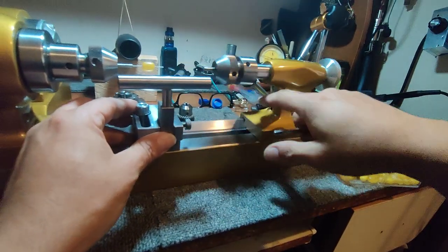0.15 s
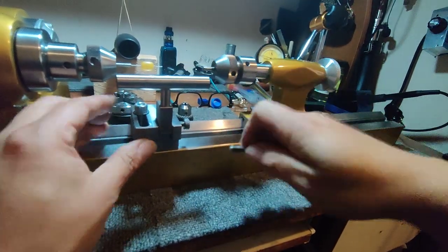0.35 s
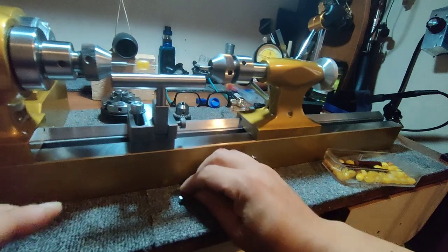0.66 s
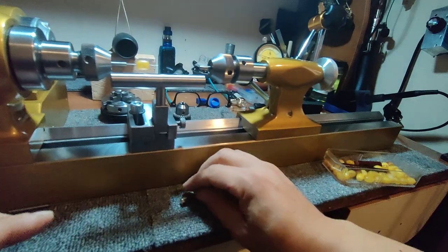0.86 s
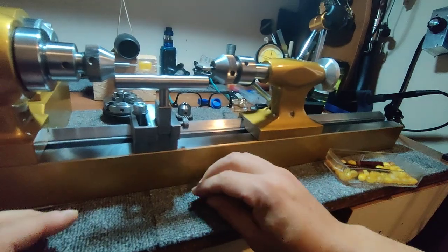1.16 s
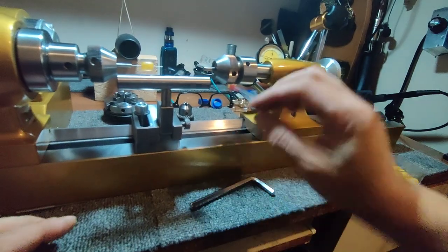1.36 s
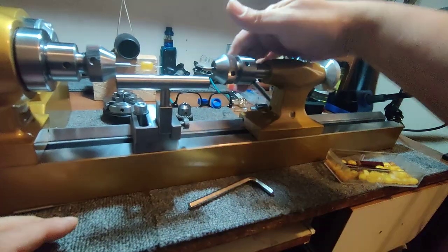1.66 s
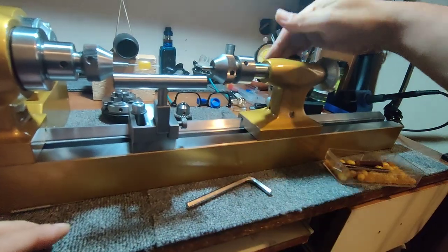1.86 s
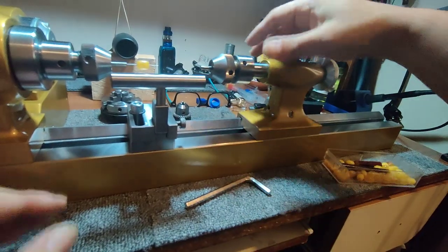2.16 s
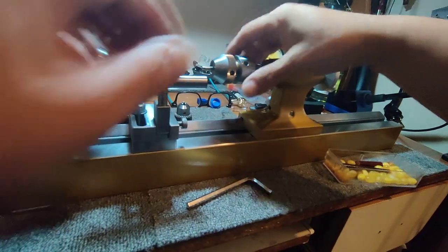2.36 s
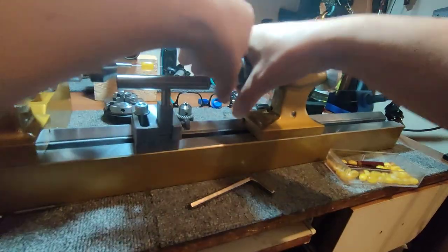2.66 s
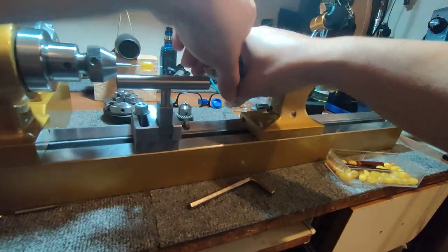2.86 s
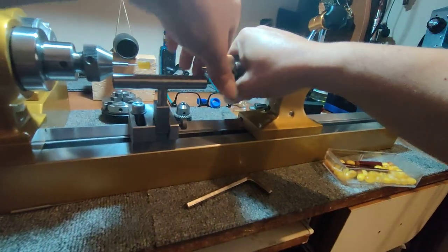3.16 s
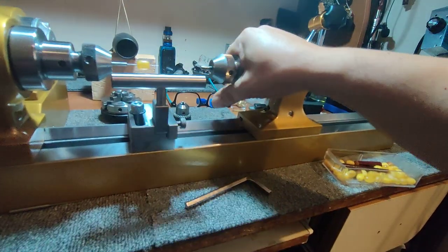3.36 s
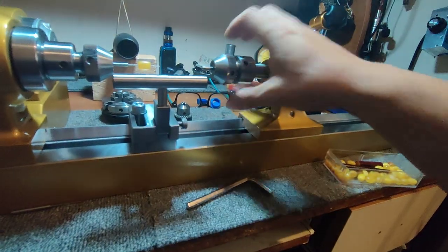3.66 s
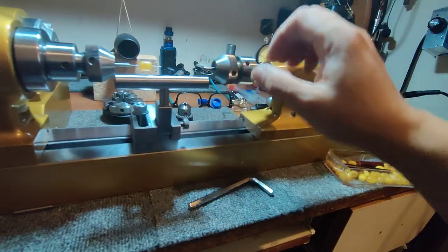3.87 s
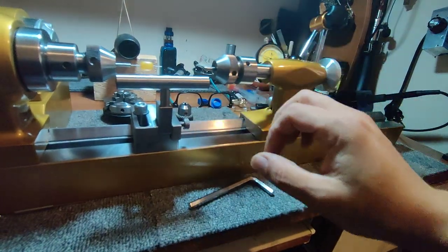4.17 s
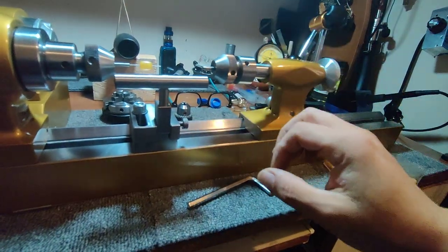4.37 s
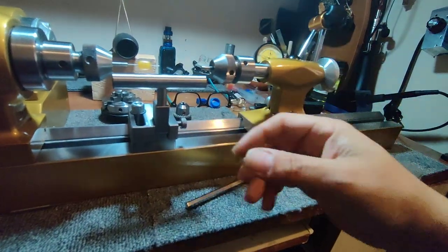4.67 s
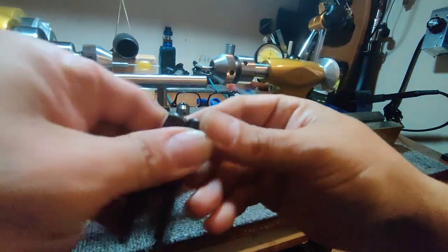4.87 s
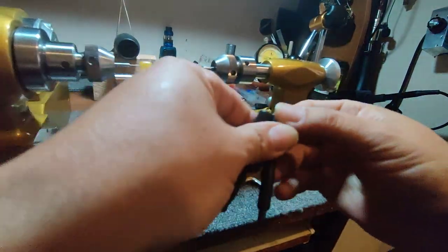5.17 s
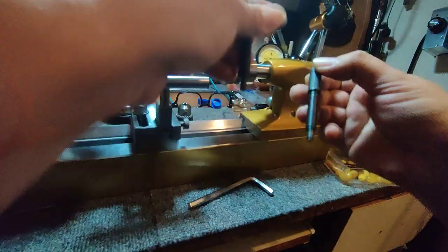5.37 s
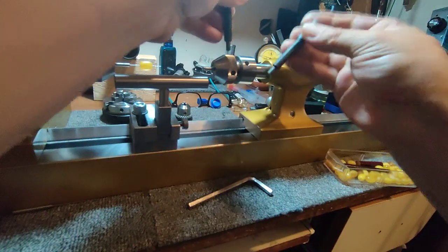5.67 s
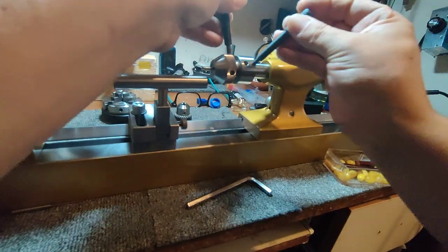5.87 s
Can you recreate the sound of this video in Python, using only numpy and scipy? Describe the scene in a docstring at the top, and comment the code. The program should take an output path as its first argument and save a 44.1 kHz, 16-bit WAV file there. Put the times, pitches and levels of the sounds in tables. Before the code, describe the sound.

Close up in a quiet room, a metal key drops and rings, a machine part thuds home, and steel rods clink, scrape and clack sharply.

```python
"""A quiet room: hands adjust a small metal lathe on a mat-covered workbench, heard from close by.
A hex key is laid down and rings; the tailstock is pushed home with a knock; two steel rods are picked up
with clinks and a scrape, clack together once and are fitted to the chuck. Blows, clinks and clack are
dying modes plus noise bursts; friction is grainy noise, partly driving modes; hum, hiss and rumble are
shaped noise."""
import sys
import numpy as np
from scipy import signal
from scipy.fft import rfft, irfft
from scipy.io import wavfile
from scipy.ndimage import uniform_filter1d

SR = 44100
rng = np.random.default_rng(int(sys.argv[2]) if len(sys.argv) > 2 else 0)


def unload_wav(signal):
    """Save mono or channel-first audio to the path in sys.argv[1] as 16-bit WAV at rate SR, clipped to [-1, 1]."""
    wavfile.write(
        sys.argv[1],
        SR,
        np.round(np.clip(np.atleast_2d(signal).T, -1, 1) * 32767).astype(np.int16),
    )


N = 265041
T = np.arange(N) / SR

# lathe bed and bench top modes: f/Hz, relative level/dB, t60/s
BED_MODES = [(49.6, -10.5, 0.45), (118.9, 0.5, 0.18), (172, -22, 0.28), (211.7, -14, 0.2),
             (237.9, -11.5, 0.23), (295.1, -6, .2), (323, -15, 0.19), (418, 7, 0.068), (440, -10.5, 0.096),
             (467.5, -5, 0.14), (541.6, -12, 0.1803), (587.6, -11, 0.11), (657, -15, 0.14),
             (744, -20, 0.17), (920, -12, 0.085), (1300, -18, 0.099)]
# free rod modes: f/Hz, relative level/dB, t60/s
ROD_RING_MODES = [(7820, -4, 0.11), (7892, -1, 0.21), (8039, -9.5, 0.18), (8240, -18, 0.097),
                  (7810, 4.5, 0.041), (6210, -5, 0.037), (10000, -28, 0.097)]
# lower rod modes, damped by the fingers: f/Hz, relative level/dB, t60/s
ROD_DAMPED_MODES = [(1750, -4.5, .04), (1960, -5, .04), (2230, -4.5, .04), (2470, -4, .04), (2900, -5, .04),
                    (3750, -4, .035), (4410, -1, 0.042), (4750, -1, 0.037), (5430, -1, 0.034),
                    (6060, 0, 0.039), (6760, -2.5, 0.035)]
# steel contact spectrum: f/Hz, relative density/dB per Hz
TICK_SPECTRUM = [(600, -21), (1300, -17), (1800, 0.5), (3200, -4), (4800, 1.5), (6300, 5), (7400, -2),
                 (8100, -16), (9000, -29), (16000, -32)]


def amp(db):
    """Decibels to gain."""
    return 10 ** (np.asarray(db) / 20)


def evened(x):
    """Scales to rms 1."""
    return x / np.sqrt(np.mean(x ** 2) + 1e-20)


def grainy(grain_db, samples):
    """Gain over time that wanders at random by grain_db rms; samples sets the smoothing."""
    return amp(grain_db * evened(uniform_filter1d(rng.standard_normal(N), size=samples)))


def read(points, hz):
    """Reads a table on a log-frequency axis."""
    f, value = np.transpose(points)
    return np.interp(np.log(hz + 1), np.log(f + 1), value)


def sides(pan_db):
    """Left and right gains; positive favours left."""
    return amp([[pan_db / 2], [-pan_db / 2]])


def both_ears(x, left_lag_s=0.00014):
    """One sound from the side of the rods, reaching the left ear later."""
    return np.array([np.roll(x, round(left_lag_s * SR)), x])


def add(mix, s, sound):
    """Mixes a sound in at time s."""
    part = mix[:, max(round(s * SR), 0):][:, :sound.shape[-1]]
    part += sound[..., :part.shape[1]]


def colour(x, spectrum, size=2048):
    """Causal minimum-phase filter of unit energy with the given spectrum."""
    hz = abs(np.fft.fftfreq(size, 1 / SR))
    log_gain = np.log(amp(np.maximum(read(spectrum, hz), -100)))
    response = np.exp(np.conj(signal.hilbert(log_gain)))
    taps = np.fft.ifft(response).real[:size // 2]
    return signal.oaconvolve(x, taps[None] / np.linalg.norm(taps), axes=1)[:, :x.shape[1]]


def noise(spectrum, likeness=None):
    """Steady stereo noise of rms 1; likeness sets how alike the ears are at each pitch."""
    # f/Hz, left-right likeness (below 0 counts as 0)
    usual_likeness = [(25, 0.88), (60, 0.99), (130, 0.55), (290, 0.94), (640, 0.33), (1410, -0.11),
                      (3100, -0.07), (6820, -0.35), (15000, 0.01)]
    hz = np.fft.rfftfreq(N, 1 / SR)
    a, b = rfft(rng.standard_normal((2, N)))
    same = np.clip(read(usual_likeness if likeness is None else likeness, hz), 0, 1)
    pair = np.array([a, same * a + np.sqrt(1 - same ** 2) * b])
    return evened(irfft(pair * amp(read(spectrum, hz)), N))


def ring(modes, step=1):
    """Dying modes, mode k weighted by step ** k: a negative step alternates the starting direction."""
    t = np.arange(SR)[None] / SR
    return sum(step ** k * amp(db) * np.exp(-np.log(1000) * t / t60) * np.sin(2 * np.pi * hz * t)
               for k, (hz, db, t60) in enumerate(modes))


def driven(x, modes):
    """Friction x keeps these modes ringing through a response of unit energy."""
    response = ring(modes, step=-0.98)
    return signal.oaconvolve(x, response / np.linalg.norm(response), axes=1)[:, :N]


def burst(decay_s, rise_s=.0001, size=6000):
    """A contact: a spray of tiny impacts that builds and quickly dies."""
    t = np.arange(size) / SR
    return rng.standard_normal((2, size)) * np.exp(-t / decay_s) * (1 - np.exp(-t / rise_s))


def bounces(s, touches, gap_s, fade_db):
    """Time and relative dB of each touch as a part comes to rest."""
    return [(s + k * gap_s, k * fade_db) for k in range(touches)]


def struck(hits, modes, right_lag_s, focus_db=8.5):
    """Each hit rings the same modes, weaker by focus_db one octave off its own pitch; right lags."""
    out = np.zeros((2, N))
    for s, db, focus_hz in hits:
        focused = [(hz, mode_db - focus_db * np.log2(hz / focus_hz) ** 2, t60)
                   for hz, mode_db, t60 in modes]
        sound = amp(db) * ring(focused, step=-0.98)
        add(out[:1], s, sound)
        add(out[1:], s + right_lag_s, sound)
    return out


def swells(rows):
    """Gain over time: one smooth bell for each (middle, length, dB) movement."""
    return sum(amp(db) * np.exp(-2 * ((T - s) / length * 2) ** 2) for s, length, db in rows)


def room(x, wet_db, gap_s=.003, step_size=12):
    """Adds the dense short echo of the bench, machine and near walls."""
    # f/Hz, t60/s
    room_t60 = [(100, 0.29), (500, .25), (2000, 0.18), (7000, 0.19), (14000, 0.14)]
    count = SR // 2 // step_size
    taps = np.zeros((2, SR))
    at = round(gap_s * SR) + step_size * np.arange(count) + rng.integers(0, step_size, (2, count))
    np.put_along_axis(taps, at, rng.choice([-1., 1.], at.shape), 1)
    hz, t, z = signal.stft(taps, SR, nperseg=256)
    decay = np.exp(-np.log(1000) * t / read(room_t60, hz)[:, None])
    tail = signal.istft(z * decay, SR, nperseg=256)[1]
    return x + amp(wet_db) * signal.fftconvolve(x, tail / np.linalg.norm(tail[0]), axes=1)[:, :N]


def bench(build_up_s=0.0044):
    """Blows ring bed and bench top: light parts touch briefly and spare deep modes; loose parts clatter."""
    # blows: t/s, level/dB, lowest f moved/Hz, loose-part clatter/dB, touches
    knocks = [(0.072, -54, 69.5, -76, 1), (0.324, -59.5, 70, -85, 1), (0.428, -64, 70, -85, 1),
              (0.697, -38.5, 89, -52, 1), (0.702, -39, 398, -54, 1), (1.241, -46, 201, -80, 1),
              (1.278, -51.5, 150, -60, 1), (1.712, -46, 378, -57.5, 1), (1.762, -48.5, 378, -67, 1),
              (1.851, -34, 353, -44.5, 1), (1.859, -31, 348, -45.5, 1), (1.914, -51, 204, -32.5, 1),
              (1.921, -22, 57.6, -42, 1), (3.105, -52, 60, -74, 1), (3.172, -42.5, 300, -64, 2),
              (4.088, -43, 240, -54.5, 2), (4.152, -44.5, 236, -50.5, 1), (4.288, -39.5, 210, -44.5, 1),
              (4.361, -42, 259, -47, 1), (4.413, -45.5, 200, -61, 1), (5.883, -44.5, 531, -54, 1),
              (5.969, -42, 517, -52.5, 1)]
    # f/Hz, relative density/dB per Hz
    clatter = [(290, -19.5), (500, -2.5), (714, -9), (1650, -14.5), (2170, -15.5), (2610, -12), (3270, -17),
               (3750, -16.5), (5230, -16), (6570, -16.5), (8250, -38), (15000, -46)]
    heavy_contact_s, half_contact_hz = 0.0023, 583  # halved for a part that moves nothing below this
    rock_s, rock_db = 0.017, -2.5  # a part that rocks into its seat touches again later and weaker
    body, loose = np.zeros((2, 2, N))
    t = np.arange(SR // 20) / SR
    spread = 1 - np.exp(-np.arange(SR) / SR / build_up_s)  # bending waves take a moment to fill the top
    top = spread * ring(BED_MODES, step=-1.025)
    for s, db, lowest_hz, clatter_db, touches in knocks:
        contact_s = heavy_contact_s / (1 + (lowest_hz / half_contact_hz) ** 2)
        push = t * np.exp(-4 * t / contact_s)
        highpass = signal.butter(2, lowest_hz, "high", fs=SR, output="sos")
        push = signal.sosfilt(highpass, push / push.sum())
        thud = signal.fftconvolve(top, push[None], axes=1)
        for at, weaker_db in bounces(s, touches, rock_s, rock_db):
            add(body, at, amp(db + weaker_db) * thud)
            add(loose, at, amp(clatter_db + weaker_db) * burst(decay_s=0.007, rise_s=0.00083))
    thuds = room(body, wet_db=-7.5).mean(0)  # long waves reach both ears alike
    return thuds + room(colour(loose, clatter) * sides(pan_db=-1.5), wet_db=-5.0)


def tailstock():
    """The casting clunks as it takes up its play and meets the stop."""
    # steel knocking inside the casting: t/s, level/dB, f rung most/Hz
    hits = [(1.277, -58, 1700), (1.712, -58, 1100), (1.852, -50, 1000), (1.860, -39, 1100),
            (1.866, -47, 1150), (1.914, -45, 3200), (1.918, -39, 950), (1.921, -44, 2000),
            (4.089, -51, 1470), (4.097, -55, 1320), (4.108, -54, 1400)]
    # f/Hz, relative level/dB, t60/s
    modes = [(720, -5, 0.078), (925, -6, .09), (992, -1, 0.07), (1103, -10.5, 0.066), (1293, -3, 0.058),
             (1587, -7, 0.06), (1960, -4, 0.048), (2376, -5, 0.073), (2565, -2, 0.069), (2760, -4.5, 0.081),
             (3016, -9, .1), (3850, -5, .05)]
    return room(struck(hits, modes, right_lag_s=.00016) * sides(pan_db=1.2), wet_db=-7.5)


def chuck(grain_db=3):
    """The chuck murmurs as it is turned, and knocks hollowly as things settle into it."""
    # fingers and rods seating: t/s, level/dB, f rung most/Hz
    hits = [(3.172, -51.5, 480), (3.191, -48.5, 452), (5.881, -43.5, 700), (5.894, -45, 480),
            (5.909, -43, 494), (5.969, -42, 477)]
    # f/Hz, relative level/dB, t60/s
    modes = [(296, -9, 0.17), (422, 0.5, 0.078), (554, -6.5, 0.1), (617, -8, .09), (868, -9, 0.09),
             (1014, -12.5, 0.054), (1740, -6, .014)]
    # turning and rubbing by hand: middle t/s, length/s, level/dB
    turns = [(2.95, 0.63, -68.5), (3.12, 0.17, -69), (5.945, 0.067, -58)]
    friction = grainy(grain_db, samples=400) * rng.standard_normal((2, N))
    murmur = evened(signal.oaconvolve(friction, ring(modes, step=-1.05), axes=1)[:, :N])
    knocks = struck(hits, modes, right_lag_s=0.00029) * sides(pan_db=0.5)
    return room(knocks + murmur * swells(turns), wet_db=-5)


def clack(s=5.001, level_db=-6, right_lag_s=.00014, spit_db=-25):
    """Two hand-held rods meet: their modes swell and are choked within a few milliseconds."""
    # f/Hz, relative level/dB, swell time/ms, left-right/dB
    modes = [(2970, -25, 0.66, 7), (4240, -22, 1.1, 6), (5330, -19.5, 0.99, 9), (6160, -10, 1.53, 6.5),
             (7214, -1.5, 0.86, -8.5), (7400, -14, 0.88, -2.5), (8900, -23.5, 0.86, 0),
             (10460, -25, 0.99, 9.5), (11600, -29, 0.93, -2), (14200, -37, .3, 1.5)]
    # contact spectrum: f/Hz, relative density/dB per Hz
    spit_spectrum = [(1500, -13), (3000, -11), (6000, -1.5), (7500, 0), (9000, -11.5), (11000, -10.5),
                     (12200, -24), (16000, -32)]
    out, spit = np.zeros((2, 2, N))
    t = np.maximum(np.arange(SR // 20) / SR - np.array([[0], [right_lag_s]]), 0)
    for hz, db, swell_ms, pan_db in modes:
        u = t / (swell_ms / 1000)
        swell = (u * np.exp(1 - u)) ** 2
        add(out, s, amp(level_db + db) * sides(pan_db) * swell * np.sin(2 * np.pi * hz * t))
    add(spit, s, amp(spit_db) * burst(decay_s=0.0017))
    return room(out, wet_db=-20.5) + room(colour(spit, spit_spectrum), wet_db=-6.5)


def clinks(spit_db=4, damped_db=-17):
    """Rod touches: a dry tick, a short clink and close high modes that beat; hard ones add top treble."""
    # steel on steel: t/s, tick/dB, rod ring/dB, left-right/dB, touches
    rod_touches = [(4.124, -48, -62.5, 6, 1), (4.1757, -26, -44, 7, 1), (4.1783, -22, -36.5, 4.5, 2),
                   (4.1865, -37, -48, 2, 1), (4.246, -37, -55, 6, 1), (4.271, -42, -70, 5, 1),
                   (4.2785, -40, -62, 5, 1), (4.284, -40, -60, 11, 1), (4.289, -31.5, -46, 8, 1),
                   (4.2912, -34.5, -56, 7, 1), (4.360, -42.5, -70, 8, 1), (4.411, -51, -78, 7, 1),
                   (4.427, -45.5, -74, 11, 1), (5.136, -50.5, -79.5, 10, 1), (5.156, -55, -80, 9.5, 1),
                   (5.2401, -35, -70, -4, 3), (5.612, -49, -86.5, 6, 1), (5.8775, -51, -73, 9, 1),
                   (5.967, -46, -67.5, 6, 1)]
    # treble of a hard contact: f/Hz, relative density/dB per Hz
    spit_spectrum = [(1500, -15), (3000, -4), (6000, -6), (9000, -4.5), (14000, -13), (16000, -26)]
    bounce_s, bounce_db = 0.0158, -5  # a loosely held rod bounces, weaker each time
    pressed_db, chatter_s = -26, .0026  # above this tick level it is pressed hard and chatters quickly
    ticks, spits, rings, lows = np.zeros((4, 2, N))
    rod = ring(ROD_RING_MODES)
    damped = both_ears(ring(ROD_DAMPED_MODES, step=-0.98)[0])
    for s, tick_db, ring_db, pan_db, touches in rod_touches:
        add(rings, s, amp(ring_db) * rod)
        gap_s = chatter_s if tick_db > pressed_db else bounce_s
        for at, weaker_db in bounces(s, touches, gap_s, bounce_db):
            touch_db = tick_db + weaker_db
            contact = sides(pan_db) * both_ears(burst(decay_s=0.00097)[0])
            add(ticks, at, amp(touch_db) * contact)
            add(spits, at, amp(2 * touch_db + spit_db) * contact)
            add(lows, at, amp(touch_db + damped_db) * sides(pan_db) * damped)
    dry_clinks = colour(ticks, TICK_SPECTRUM) + colour(spits, spit_spectrum) + lows
    return room(dry_clinks, wet_db=-11.5) + room(rings * sides(pan_db=-2.5), wet_db=-6)


def scrape(slips_per_s=1500, clump_db=1.5, spread_db=3, ring_db=-13, grind_db=-1.5, damped_db=-4.5):
    """Steel slips on steel, a few slips large; each drag bites, holds, lets go and keeps the rod singing."""
    # rod dragged off its rest: t/s, length/s, level/dB
    drags = [(4.124, 0.043, -57), (4.2, 0.07, -61.5), (4.264, 0.012, -45.5), (4.275, 0.014, -42),
             (4.295, 0.0073, -57), (4.404, 0.037, -56.5), (4.445, 0.086, -66.5)]
    # f/Hz, relative density/dB per Hz
    grind_spectrum = [(600, -25), (1300, 4.5), (2000, 5.5), (3200, -1), (4900, -2), (6200, -0.5),
                      (7200, -10), (7900, 0), (8800, -49), (14000, -29)]
    attack_s, release_s = 0.0053, 0.0041
    pressure = sum(amp(db) * np.clip((T - s) / attack_s, 0, 1)
                   * np.exp(-np.maximum(T - s - length, 0) / release_s) for s, length, db in drags)
    clumps = grainy(clump_db, samples=100)
    sizes = amp(spread_db * np.minimum(rng.exponential(1, N), 3))
    happens = rng.random(N) < slips_per_s / SR
    impulses = evened(clumps * sizes * happens * rng.standard_normal(N))
    slips = both_ears(impulses * pressure)
    grind = amp(grind_db) * colour(slips, grind_spectrum) + amp(damped_db) * driven(slips, ROD_DAMPED_MODES)
    singing = amp(ring_db) * driven(slips, ROD_RING_MODES)
    return room(grind * sides(pan_db=5.0) + singing, wet_db=-6.5)


def hex_key(tick_db=-4):
    """The key lands on the mat end first, then flat, and its modes ring on."""
    # t/s, level/dB
    key_touches = [(0.692, -59), (0.702, -41.5)]
    # f/Hz, relative level/dB, t60/s
    modes = [(1955, -21.5, 0.7), (3143, -9, 0.75), (3147, -4, 0.15), (4360, -9.5, 0.63), (4364, -12, 0.16),
             (8576, -5.5, 0.11), (9350, -10.5, 0.15), (15120, -39, .15)]
    rings, ticks = np.zeros((2, 2, N))
    for s, db in key_touches:
        add(rings, s, amp(db) * ring(modes))
        add(ticks, s, amp(db + tick_db) * burst(decay_s=0.0027))
    return rings * sides(pan_db=11.0) + room(colour(ticks, TICK_SPECTRUM), wet_db=-3.0)


def squeak(flutter_db=2.5, sag_per_s=1.4, jitter=.006):
    """Stick-slip in the tailstock clamp: pitch and level follow one unsteady arch, with harmonics."""
    # t/s, length/s, top f/Hz, level/dB
    squeaks = [(0.002, 0.02, 850, -76), (0.023, 0.045, 1190, -77.5), (0.103, 0.12, 944, -68.5)]
    # multiple of f, relative level/dB
    harmonics = [(1, -10), (2, 0.5), (5, -16)]
    out = np.zeros((2, N))
    for s, length, top_hz, db in squeaks:
        arch = np.sin(np.pi * np.arange(0, length, 1 / SR) / length)
        waver, flutter = evened(uniform_filter1d(rng.standard_normal((2, len(arch))), size=90))
        sag = 1 - sag_per_s * length * (1 - arch)  # longer squeaks fall further at both ends
        phase = 2 * np.pi * np.cumsum(top_hz * sag * (1 + jitter * waver)) / SR
        tone = sum(amp(harmonic_db) * np.sin(k * phase) for k, harmonic_db in harmonics)
        add(out, s, amp(db) * arch * amp(flutter_db * flutter) * tone)
    return room(out, wet_db=-7)


def brush():
    """Fingertips graze a loose steel part and make it sing briefly."""
    # middle t/s, length/s, level/dB
    strokes = [(3.951, .02, -65.5), (3.978, 0.064, -65.5)]
    # f/Hz, relative level/dB, t60/s
    modes = [(1150, -6, .006), (2400, -3, .004), (4240, -1, .006), (5700, -4, .05), (6200, -2, .005),
             (6860, -9, .01)]
    friction = rng.standard_normal((2, N)) * swells(strokes)
    return room(driven(friction, modes) * sides(pan_db=6), wet_db=-8)


def rubs(grain_db=3, body_db=-5):
    """Soft grainy hiss under each stroke of the hand; the same grain makes the lathe bed murmur."""
    # fingers sliding over mat, machine and rods: middle t/s, length/s, level/dB
    strokes = [(0.12, 0.31, -84), (0.41, 0.044, -78.5), (1.0, 0.16, -75), (1.27, 0.62, -69.5),
               (1.78, 0.24, -63), (3.18, 0.096, -62.5), (3.96, 0.089, -65.5), (4.47, 0.14, -63.5),
               (5.27, 0.51, -63.5), (5.6, 0.29, -63)]
    # f/Hz, relative density/dB per Hz
    hiss_spectrum = [(500, 3), (1200, -4.5), (2400, -2), (3300, -8.5), (4400, -3), (5200, -7), (6100, 1.5),
                     (7200, -12), (8300, -19.5), (11000, -19), (15000, -29.5)]
    grain = grainy(grain_db, samples=120)
    bed = signal.oaconvolve(grain * rng.standard_normal(N), ring(BED_MODES, step=-1.03)[0])[:N]
    return swells(strokes) * (evened(noise(hiss_spectrum) * grain) + amp(body_db) * evened(bed))


def background(hum_db=-57, hiss_db=-66, hum_dip_share=0.77, waver_db=1.6):
    """Low room hum that wavers a little, even hiss, both dipping at first; slow rumble as arms push air."""
    # f/Hz, relative density/dB per Hz (three spectra)
    hum_spectrum = [(20, -6.5), (38, -4), (52, 8.5), (66, -1.5), (100, -14.5), (170, -14.5), (240, -12.5),
                    (300, -7.5), (350, -16.5), (410, -12), (520, -17.5), (750, -22), (1200, -38)]
    hiss_spectrum = [(400, -24), (700, -6), (900, -4), (1400, -4.5), (1900, -8.5), (2400, -6), (3300, -10),
                     (4300, -8), (6300, -10.5), (7300, -14.5), (8300, -21.5), (14500, -23.5),
                     (16000, -17.5)]
    rumble_spectrum = [(8.8, -25), (15, 6.5), (32, 2.5), (53, -5.5), (119, -24.5), (179, -32), (200, -27),
                       (260, -74), (440, -120)]
    # f/Hz, left-right likeness
    rumble_likeness = [(20, .1), (60, .55), (150, .9)]
    # middle t/s, length/s, level/dB
    arm_moves = [(0.85, 0.38, -58), (1.68, 0.19, -38.5), (1.803, 0.064, -40), (1.98, 0.29, -41.5),
                 (2.27, 0.37, -45.5), (3.15, 0.24, -55.5), (3.758, 0.054, -51), (4.16, 0.2, -45.5),
                 (4.27, 0.15, -41), (5.91, 0.12, -42.5), (6.0, 0.14, -38)]
    # t/s, relative level/dB
    dip = [(0, -12), (0.6, -23), (1.0, -8.5), (1.4, -6)]
    dip_db = np.interp(T, *np.transpose(dip))
    rates_hz = np.geomspace(.7, 6, 12)
    waver = evened(sum(np.sin(2 * np.pi * (rate * T + rng.random())) for rate in rates_hz))
    hum = noise(hum_spectrum) * amp(hum_db + hum_dip_share * dip_db + waver_db * waver)
    hiss = noise(hiss_spectrum) * amp(hiss_db + dip_db)
    rumble = noise(rumble_spectrum, rumble_likeness) * swells(arm_moves)
    return hum + hiss + rumble


def scene():
    """Everything on and around the bench."""
    lathe = bench() + tailstock() + chuck()
    rods = clack() + clinks() + scrape()
    touches = hex_key() + squeak() + brush() + rubs()
    return lathe + rods + touches + background()


def record(dry, lopsided=0.15, blip_hz=450, edge_hz=15600):
    """The microphone bends unevenly, so loud peaks leave a low blip; then the band limit."""
    blip = signal.sosfilt(signal.butter(2, blip_hz, fs=SR, output="sos"), dry ** 2)
    lowpass = signal.firwin(255, edge_hz, window=("kaiser", 8), fs=SR)
    return signal.oaconvolve(dry - lopsided * blip, lowpass[None], "same")


dry = scene()
out = record(dry)
unload_wav(out)
```